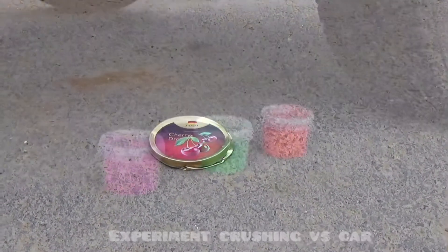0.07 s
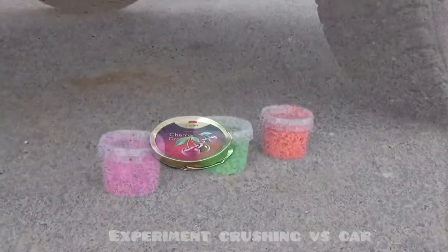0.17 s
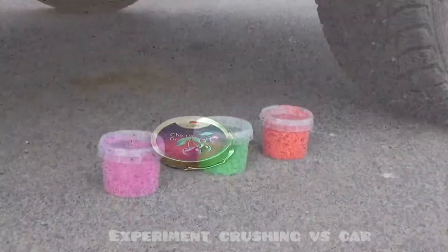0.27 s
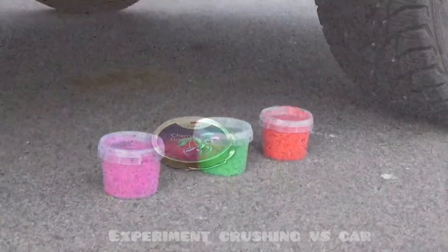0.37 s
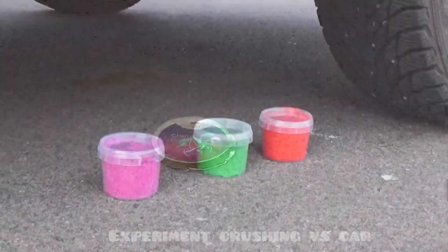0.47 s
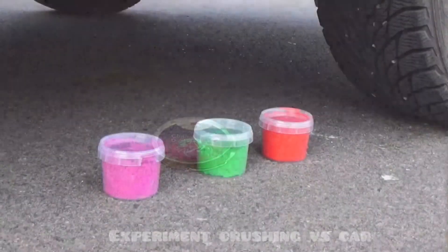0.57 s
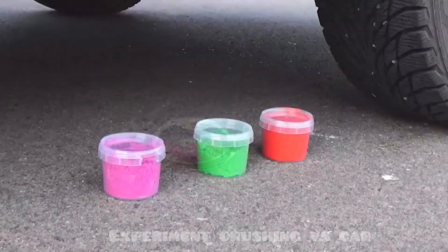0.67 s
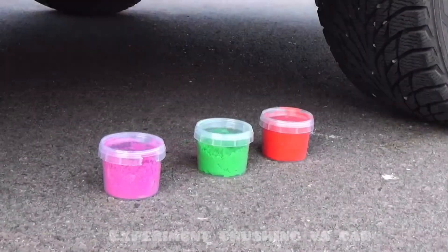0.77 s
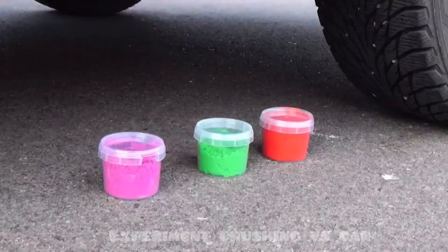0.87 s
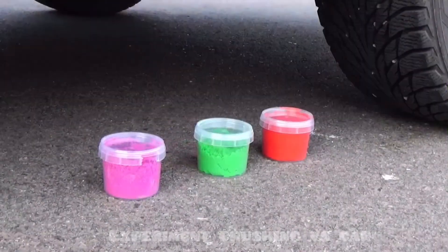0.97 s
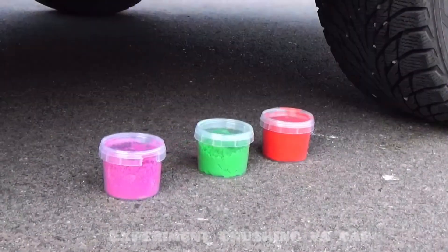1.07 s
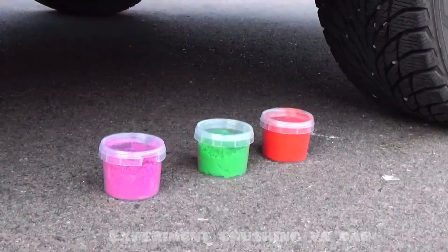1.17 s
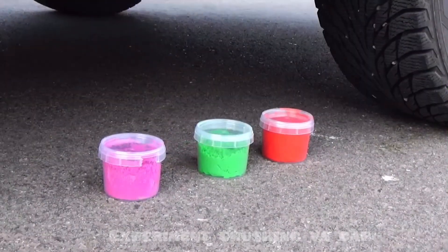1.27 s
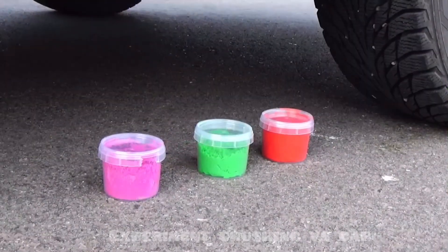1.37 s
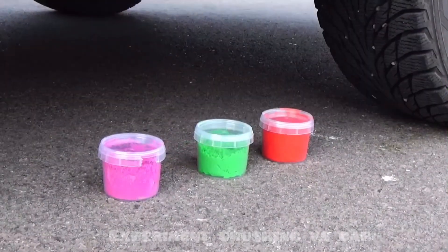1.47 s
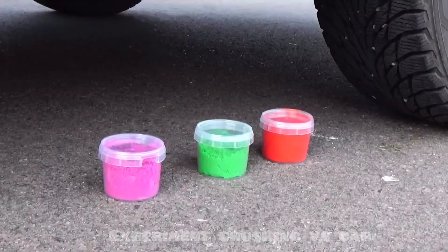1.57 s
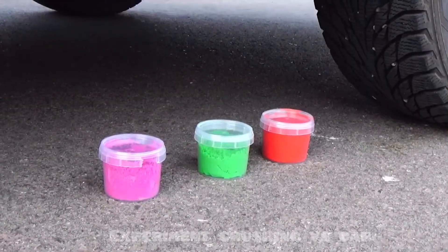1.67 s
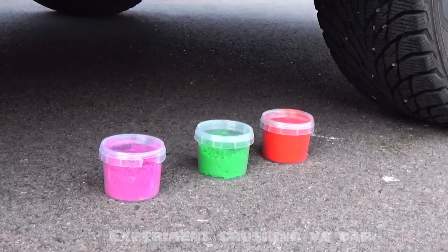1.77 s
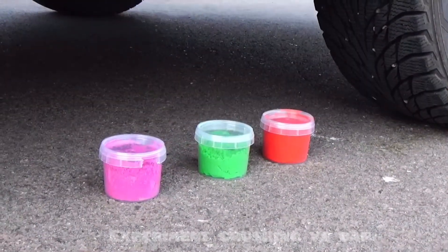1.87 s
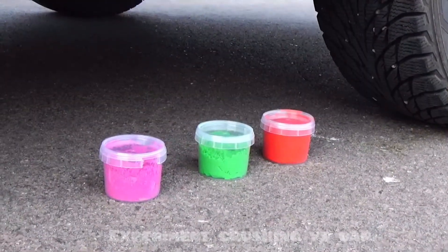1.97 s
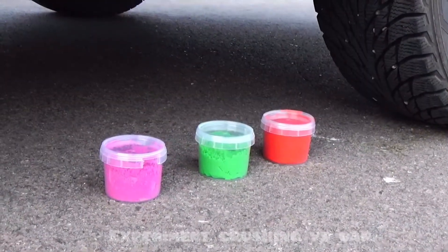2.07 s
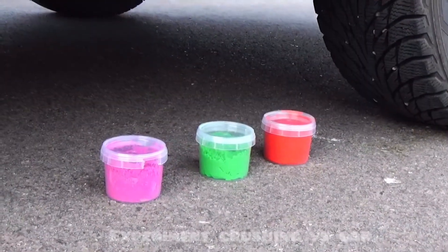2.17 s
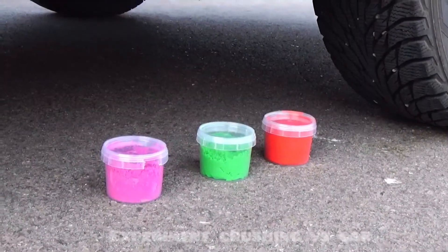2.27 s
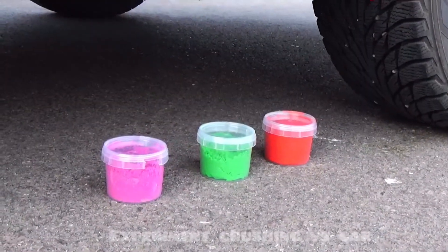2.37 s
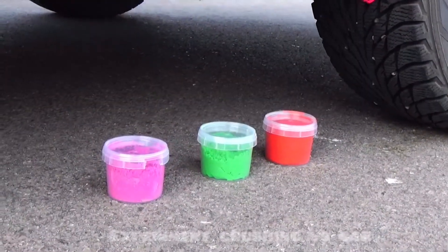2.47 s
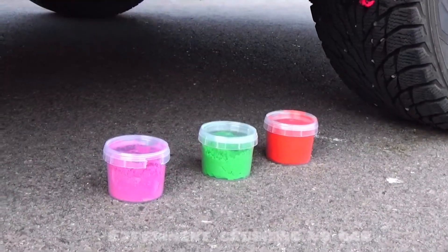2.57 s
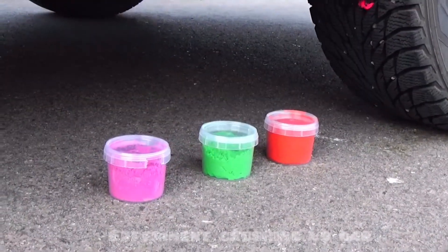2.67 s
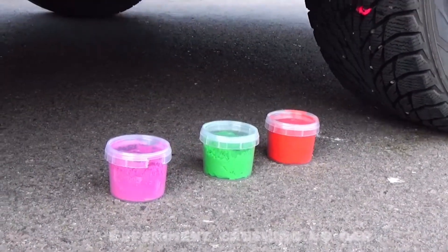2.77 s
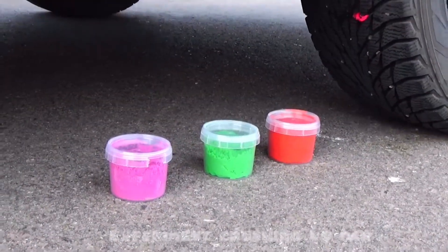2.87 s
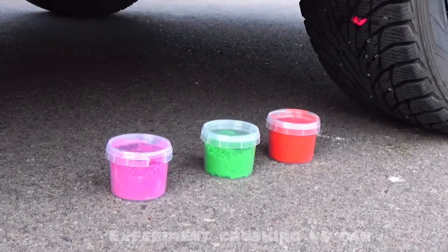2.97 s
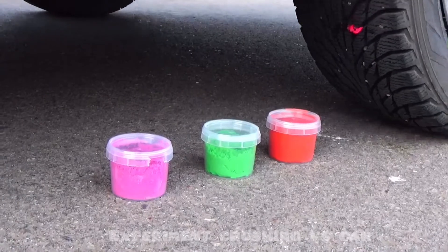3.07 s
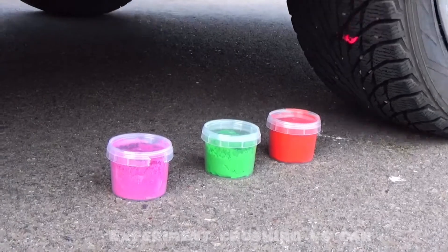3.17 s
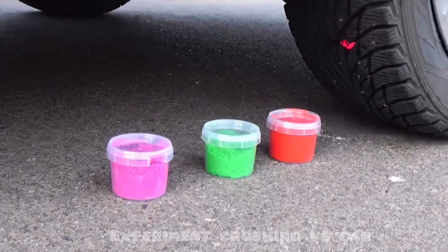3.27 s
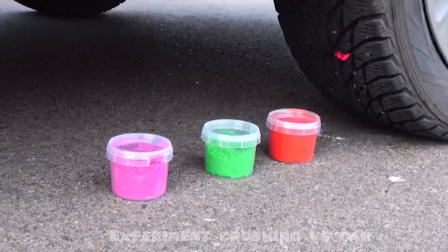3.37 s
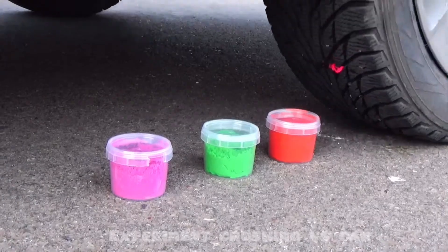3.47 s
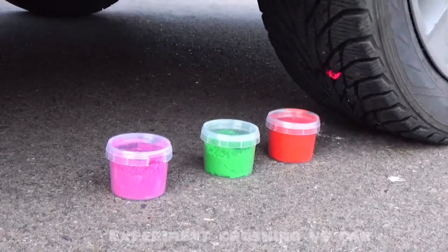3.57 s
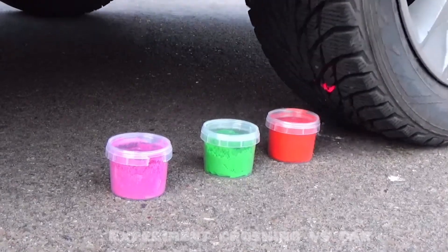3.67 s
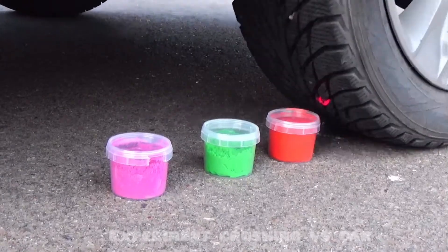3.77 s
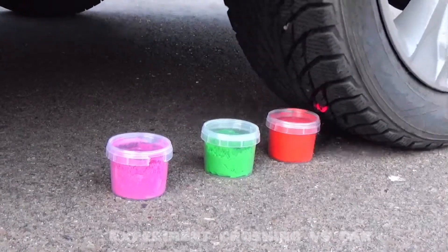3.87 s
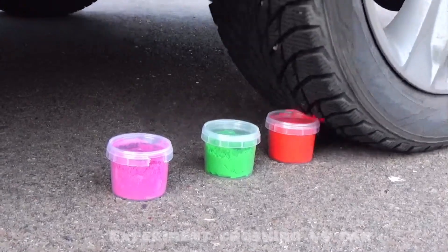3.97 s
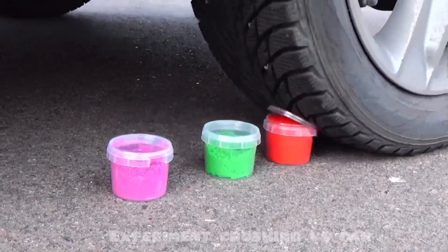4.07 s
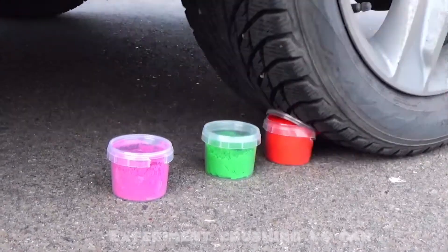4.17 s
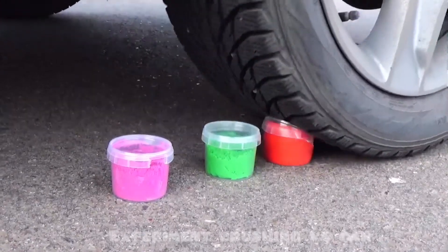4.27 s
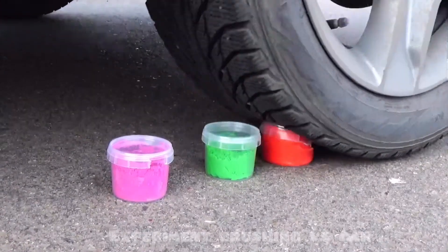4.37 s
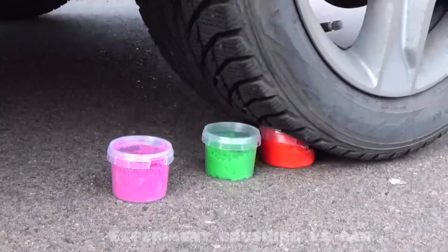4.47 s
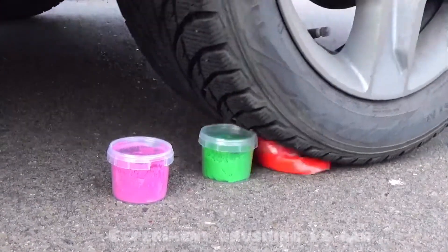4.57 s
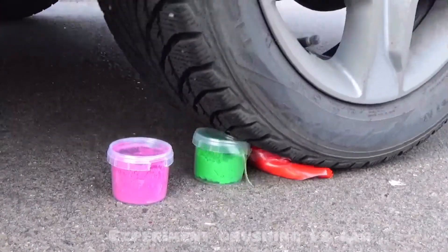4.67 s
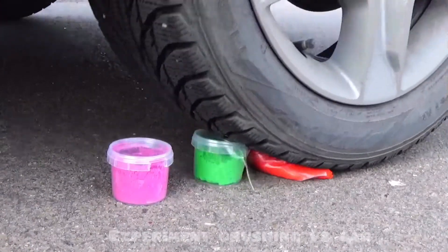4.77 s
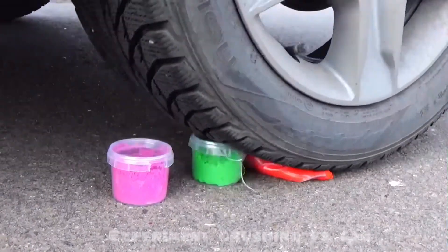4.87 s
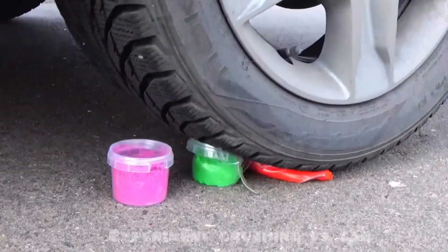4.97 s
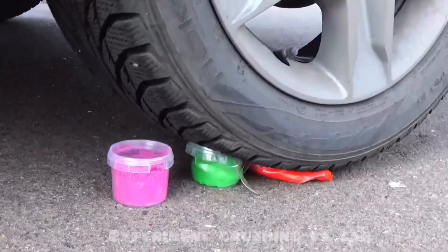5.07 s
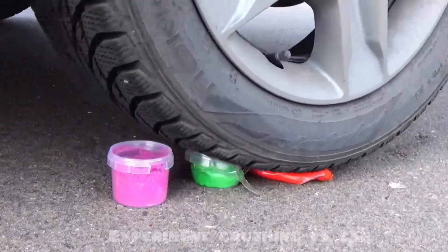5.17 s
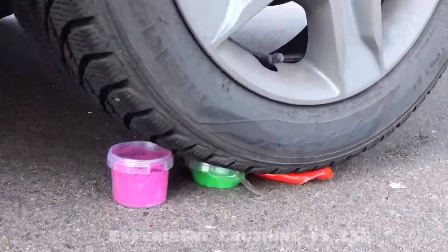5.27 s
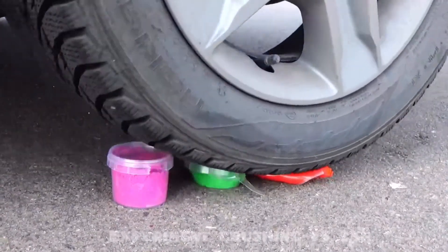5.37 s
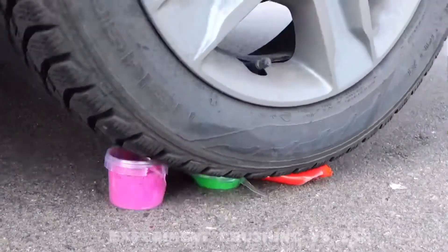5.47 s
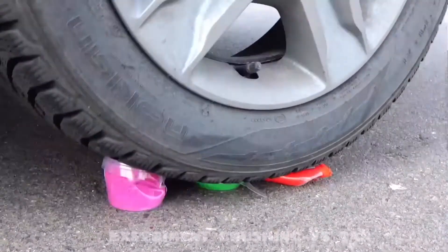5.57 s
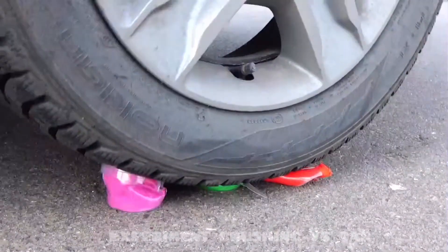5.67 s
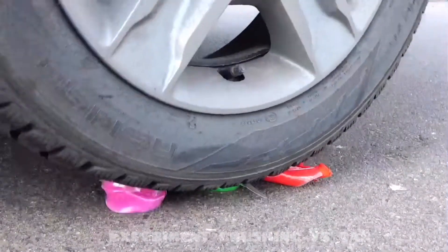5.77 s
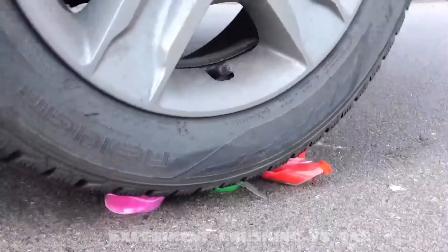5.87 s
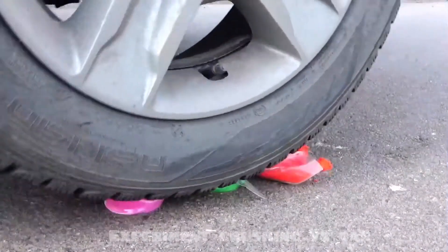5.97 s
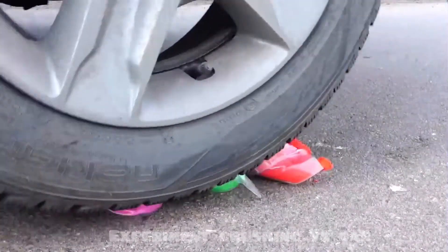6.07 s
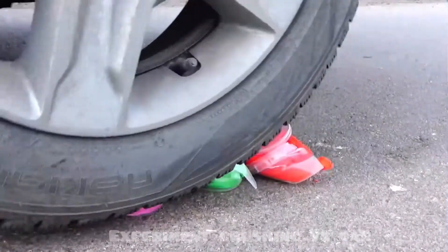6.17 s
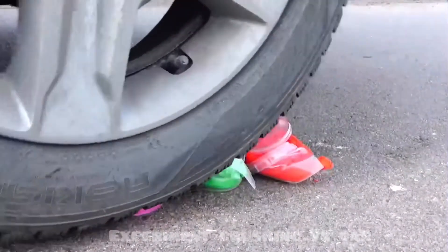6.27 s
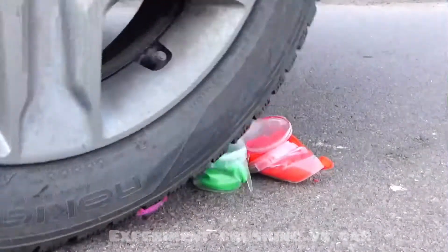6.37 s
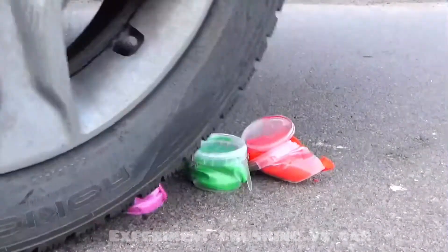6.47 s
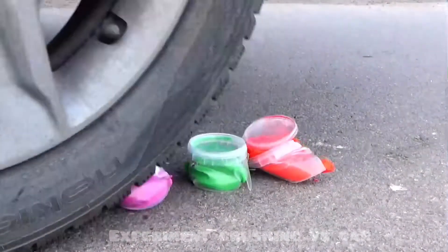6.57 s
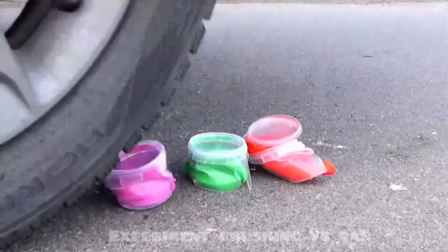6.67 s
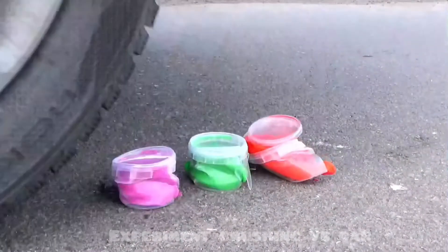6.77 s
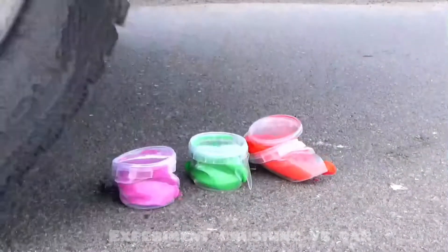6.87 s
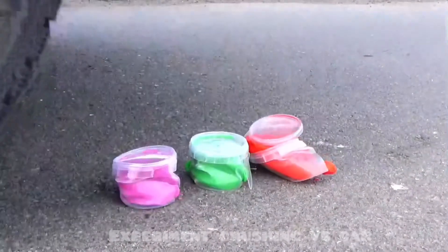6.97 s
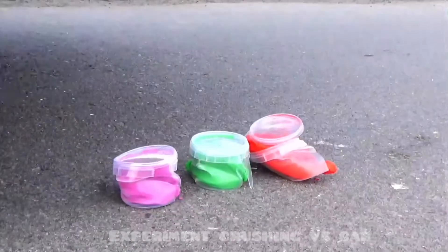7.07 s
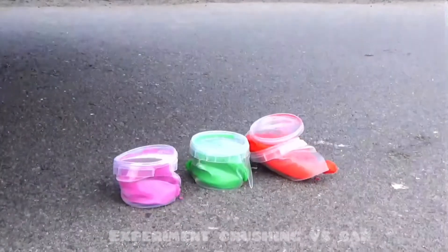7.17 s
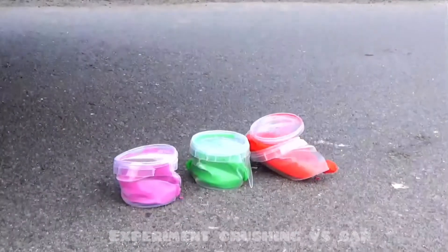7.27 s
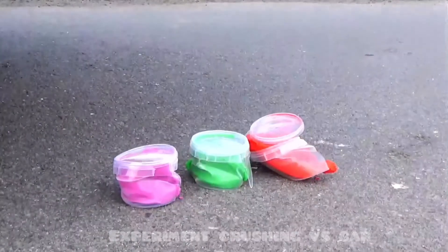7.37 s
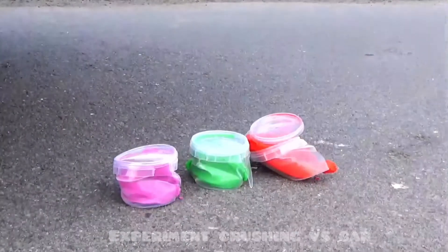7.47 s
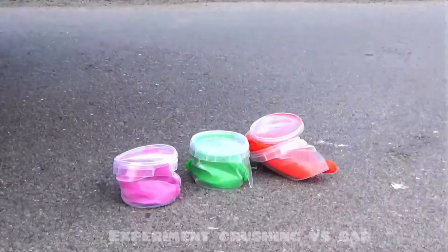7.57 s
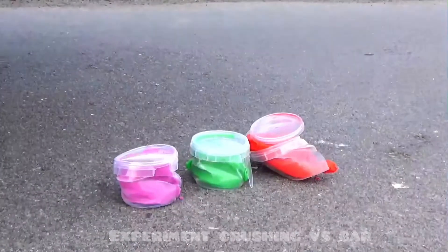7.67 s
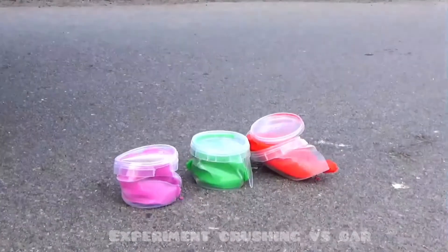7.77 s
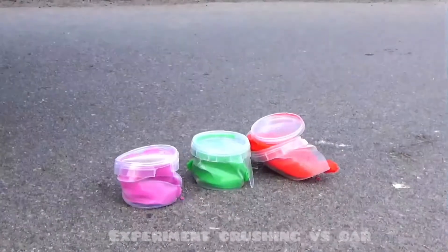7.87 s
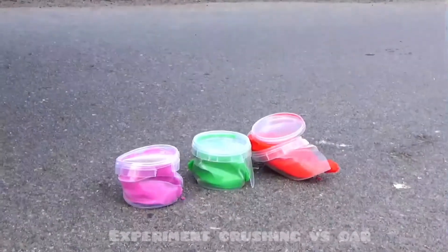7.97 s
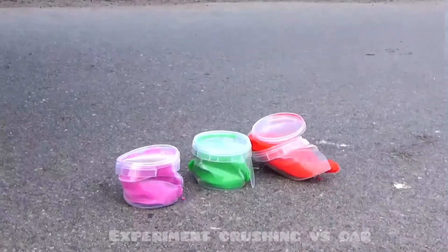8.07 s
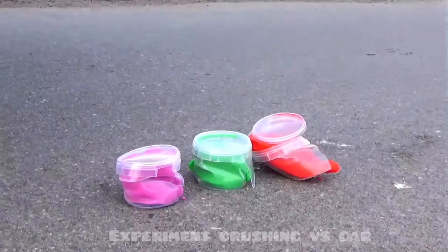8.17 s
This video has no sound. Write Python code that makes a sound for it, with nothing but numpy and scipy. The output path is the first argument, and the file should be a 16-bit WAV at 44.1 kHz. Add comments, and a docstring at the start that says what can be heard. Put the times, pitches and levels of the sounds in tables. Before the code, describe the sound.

A car engine idles low and close outdoors as a tyre slowly rolls over plastic tubs, which snap, crunch and pop, then the hum moves past.

```python
"""On asphalt, a car creeps past two close microphones, its four-cylinder engine barely above idle.
The engine sums firing orders with pulsing, filtered noise; clatter and hiss recede and the exhaust hum takes over.
The front tyre rolls over small plastic tubs: damped bursts snap, gliding tones pop and groan,
and random creases crunch, while the tyre thumps and drums. Low noise swells as air buffets the microphones."""
import sys
import numpy as np
from scipy import signal
from scipy.fft import rfft, irfft, next_fast_len
from scipy.io import wavfile
from scipy.ndimage import uniform_filter1d, minimum_filter1d

SR = 44100
rng = np.random.default_rng(int(sys.argv[2]) if len(sys.argv) > 2 else 0)


def persist_wave(psi):
    """Save psi, clipped to +-1, as 16-bit WAV."""
    counts = np.round(np.clip(psi, -1, 1) * 32767).astype(np.int16)
    wavfile.write(sys.argv[1], SR, np.atleast_2d(counts).T)


N = 362943
TIME = np.arange(N) / SR  # s

# The engine sags under load and picks up again. Each row: time in seconds, firing rate in Hz.
FIRING_RATE = [(0, 44.5), (1.65, 44.9), (1.95, 43.6), (2.5, 42.6), (6.0, 42.1), (6.54, 43.6), (6.96, 45.5),
               (7.55, 45.3), (8.23, 47.2)]
# The firing note, then its octave. Each row: level at idle in dB, growth in dB per Hz of firing rate,
# change in the wheel's shadow in dB, change as the exhaust goes by in dB, change beside the car in dB.
FIRING_NOTES = [(-29.5, 2, -4.5, 3, 0.5), (-24.5, 0.5, -11, 5, 3)]
# Weaker engine orders. Each row: multiple of the firing rate, relative level ahead of the car in dB, beside it in dB.
WEAK_ORDERS = [(.5, -33, -27), (1.5, -35.5, -31.5), (2.5, -43, -50), (3, -29.5, -41), (3.5, -35, -33.5),
               (4.5, -29.5, -31), (5, -45, -30.5), (5.5, -32.5, -37), (6, -43.5, -34.5)]
# The hum swells and sinks as the wheel rolls up. Each row: centre in seconds, half width in seconds, change in dB.
HUM_WAVERS = [(2.3, 0.29, 1.5), (2.8, .09, -9), (2.95, 0.084, 0), (3.15, 0.1, -3.5), (3.73, 0.12, -6),
              (5.72, 0.3, -3)]
# The engine bay moves away. Each row: time in seconds, relative clatter level in dB, belt and fan hiss level in dB.
BAY_LEVELS = [(1.0, -27.5, -31), (3.9, -28.5, -33.5), (5.0, -31, -35.5), (7.3, -32, -40.5),
              (8.23, -31.5, -43)]
# Spectrum of the clatter. Each row: frequency in Hz, relative level in dB.
CLATTER_SPECTRUM = [(30, -4), (110, 3), (200, -3), (290, -2.5), (420, -9), (540, -8), (700, -5), (850, -11),
                    (1250, -13), (1450, -14), (2150, -17), (2450, -18.5), (3300, -27.5), (5000, -41)]
# How the body panels colour the clatter from beside the car. Each row: frequency in Hz, gain in dB.
PANEL_GAIN = [(100, 7), (170, -1.5), (260, -3.5), (380, 2), (700, 0), (1400, 1), (2100, -1), (3000, -5)]
# Spectrum of the belt and fan hiss. Each row: frequency in Hz, relative level in dB.
HISS_SPECTRUM = [(1000, -20), (2900, -6), (3400, -1.5), (3700, 2), (3980, 3), (4300, -1), (4800, -7),
                 (5700, -6), (6500, -4), (7500, -5), (8500, -34)]
# Ringing parts of the engine. Each row: frequency in Hz, width in Hz, level ahead of the car in dB against the hiss.
RINGING_PARTS = [(349, 11, -5.5), (453, 11, -7), (1220, 50, -13), (1772, 45, -14), (2135, 75, -9),
                 (3420, 130, -15), (3946, 90, -10), (6369, 18, -20)]
# The strongest buffets of air. Each row: centre in seconds, half length in seconds, relative level in dB,
# frequency of the spectral peak in Hz.
GUSTS = [(.035, .13, -12, 137), (0.338, .05, -14.5, 142), (0.897, .07, -17, 99),
         (1.499, 0.061, -20.5, 99.3), (2.571, 0.091, -22.5, 90), (3.021, .055, -14.5, 110),
         (3.103, .065, -14, 110), (3.443, .14, -19, 114.4), (3.577, .075, -13, 96), (3.998, .04, -17, 101),
         (4.503, 0.12, -18.5, 99), (4.74, 0.074, -23, 99), (7.52, .07, -25, 131)]
# Spectrum of turbulent air, peaking at 100 Hz. Each row: frequency in Hz, relative level in dB.
AIR_SPECTRUM = [(25, -19), (60, -2), (100, 0), (160, -5), (230, -20), (600, -36.5), (2000, -72)]
# A faint squeak in two quick pulses. Each row: start in seconds, length in seconds, level in dB.
SQUEAK_PULSES = [(0.346, 0.015, -18), (0.358, 0.023, -24)]
# Partials of the squeak. Each row: frequency in Hz, relative level in dB.
SQUEAK_TONES = [(1800, -1.5), (2520, -11)]
# Snaps of a tub wall, some in quick pairs or during a crunch. Each row: start in seconds, relative level in dB,
# ring in Hz, low body in dB against the crack.
WALL_SNAPS = [(3.836, -10.5, 5350, -13), (3.9487, -16, 5030, -18), (3.96, -7.5, 2780, -3),
              (3.965, -10, 6400, -2), (4.077, -3.5, 4010, -7.5), (4.084, -10.5, 6300, -14),
              (4.141, -7.5, 4820, -4.5), (4.266, -11, 4360, -7), (4.412, -14, 4150, -7),
              (4.434, -13, 4100, 0), (4.4555, -13, 5530, 1), (4.4696, -5.5, 3850, -5),
              (4.5624, 3, 6600, -18), (4.5838, -9, 4380, -7), (4.5975, -16, 4130, -6),
              (4.6522, 0.5, 5870, -8), (4.657, -2.5, 5370, -15), (4.7934, -21, 2700, -2),
              (4.8159, 2.5, 6420, -11), (4.903, -10, 6600, -22), (4.942, -5, 4930, -7),
              (4.983, -18.5, 5270, -20), (5.0276, -9, 5500, -11), (5.48, -6.5, 4450, -24),
              (5.517, -14, 6300, -10), (5.519, -12, 5400, -1), (5.591, -11, 6050, -21),
              (5.838, -10.5, 5300, -4), (5.9576, -17.5, 4700, 10), (6.3414, -14, 2620, -18),
              (6.415, -6.5, 2200, -15), (6.4222, -13.5, 5550, -16), (6.432, -16, 6550, -5),
              (6.644, -21, 6600, -16)]
# Spectrum of a cracking tub wall. Each row: frequency in Hz, relative level in dB.
WALL_SPECTRUM = [(600, -12), (1500, -14), (2800, -10), (4000, -4), (5000, 0.5), (6500, 1), (7500, 1),
                 (8500, -14)]
# The tyre thumps down as a tub collapses. Each row: start in seconds, length in seconds, peak in dB,
# first frequency in Hz, last frequency in Hz.
TYRE_THUMPS = [(3.935, 0.044, -8.5, 97, 72.3), (4.602, .042, -8, 88.6, 118.7),
               (5.32, 0.039, -10.5, 130.4, 108), (6.407, 0.023, -10.5, 196, 151)]
# The tyre drums as it drops off a tub. Each row: start in seconds, level in dB before rise and fade.
TYRE_DRUMS = [(4.46, -16.5), (4.66, -17), (5.348, -13.5), (6.429, -20.5)]
# The tub body groans as it is squashed. Each row: start in seconds, length in seconds, level in dB,
# first frequency in Hz, last frequency in Hz.
TUB_GROANS = [(3.956, 0.11, -31, 700, 397), (4.438, 0.071, -23.5, 660, 353), (4.563, 0.095, -31, 590, 238),
              (5.217, 0.03, -26, 382, 255), (5.276, 0.084, -18.5, 600, 247)]
# Hollow pops of lids and trapped air. Each row: start in seconds, level in dB, first frequency in Hz,
# last frequency in Hz, time to fall 60 dB in seconds, lid ring in dB against the air.
LID_POPS = [(3.9658, -6.5, 910, 504, 0.019, -11), (4.7950, -7.5, 1235, 330, 0.021, -24),
            (5.2747, 0, 1010, 500, 0.0076, -8), (5.2805, -3, 460, 410, 0.019, -25),
            (5.4565, -5, 340, 262, 0.014, -36), (5.689, -12, 900, 780, 0.0086, -11),
            (6.1175, -0.5, 470, 408, 0.016, -4), (6.174, -10.5, 1020, 840, 0.011, -27),
            (6.411, -5, 520, 380, 0.012, -6), (6.623, -15, 700, 540, 0.028, -10)]
# A tub cracks, gives way and crumples. Each row: start in seconds, relative crack level in dB, rise in seconds,
# fall in seconds, crumple level in dB, cavity frequency in Hz, relative cavity level in dB,
# cavity glide in octaves per second, slit frequency in Hz, relative slit level in dB.
TUB_CRUNCHES = [(3.9716, -2.5, 0.02, 0.029, -16, 1750, -1.5, 4, 3550, -3),
                (4.0316, -3.5, .004, 0.044, -24, 1900, -11, -5, 4100, 4),
                (4.3322, -9, 0.12, 0.067, -26, 1870, -3.5, 7, 4030, -10),
                (4.4464, -6.5, 0.02, 0.023, -15.5, 2210, -4.5, -1, 4000, -8),
                (4.5606, 0, 0.021, 0.04, -11, 1500, -7, -8, 4200, -2.5),
                (5.19, -2, 0.026, 0.036, -16, 1920, 6, 4, 3900, 2.5),
                (5.2802, -4.5, 0.029, 0.028, -17, 1700, -7, -10, 4200, 3.5),
                (5.4873, -3.5, .0052, 0.03, -29, 1500, -23, -1, 3940, 9),
                (5.8329, -3, 0.0098, 0.003, -17, 1400, -20, -7, 5400, -12),
                (5.8586, -4, 0.0044, 0.026, -31, 1300, -16, -3, 4140, 6),
                (6.4081, -10, 0.0058, 0.011, -16.5, 2200, -3, -3, 3880, -16),
                (6.622, -15, 0.0013, 0.0031, -15, 2500, -0.5, 2, 3850, 11)]
# Spectrum of the creases before tilting. Each row: frequency in Hz, relative level in dB.
CREASE_SPECTRUM = [(100, 15.5), (350, 6.5), (700, 0.5), (1300, 1), (2200, -18), (2900, -16), (4000, 1),
                   (5000, -6.5), (6400, 0), (7500, -10.5)]
# Nominal left-right correlation of noise. Each row: frequency in Hz, correlation from 0 to 1.
CHANNEL_LIKENESS = [(50, .9), (125, .88), (300, .87), (700, .9), (1400, .93), (2500, .97), (4000, .98),
                    (7000, .96)]
# Stereo balance of sounds from ahead. Each row: frequency in Hz, left minus right in dB.
LEAN_AHEAD = [(50, 1), (90, -1), (150, .5), (270, 4), (460, 7.2), (800, 6), (1400, 3.8), (2500, 1.8),
              (4000, 1.6), (6000, .3)]
# Stereo balance of the engine from beside. Each row: frequency in Hz, left minus right in dB.
LEAN_BESIDE = [(50, 2), (150, 4), (270, 4.5), (460, 7.2), (800, 5.5), (1400, 5), (2500, 3.5), (4000, 1.7),
               (6000, 0)]
# Stereo balance of the tubs. Each row: frequency in Hz, left minus right in dB.
LEAN_TUBS = [(150, .5), (450, 4.3), (800, 4), (1400, 2), (2500, 1.2), (6000, .6)]

# moments of the pass: (centre s, half width s)
WHEEL_NEAREST, EXHAUST_NEAREST, TURNS_SIDE_ON = (5.48, 0.22), (6.69, 0.28), (5.5, 0.65)
IDLE_HZ = 42.2  # firing rate to which the idle levels refer
PIPE_HZ, PIPE_WIDTH_HZ, PIPE_DB = 87.9, 0.81, 2  # exhaust pipe resonance, swept by the octave
AIR_CENTRE_HZ, GUST_TRIM_DB = 100, -8.0
# weaker air around the rolling wheel: (centre s, half width s), level, unrest, rate of unrest
EDDIES_AT, EDDIES_DB, EDDIES_SWAY_DB, EDDIES_HZ = (3.9, 0.8), -32, 7, 4.9
SNAP_RISE_S, SNAP_T60_S = 0.0012, 0.0067
DRUM_HZ, DRUM_RISE_S, DRUM_FADE_DB_PER_S = 148.5, 0.017, 68.5
POP_SAG_S, LID_HZ = 0.0015, 1780  # time scale of a pop's pitch drop, ring of the lid
CRACK_HZ, CRACK_BODY_DB = 3810, -9.5  # the crack that opens a crunch
CRUMPLE_ONSET_S = 0.0049
FLAT_TILT = 0.048  # a flatter tub is brighter: dB per octave for each dB of cavity lost
FADE_IN_S, FADE_IN_DB = 0.93, -10.5
EDGE_HZ, TOP_HZ = 7400, 13000  # low-pass edges before and after the limiter


def amp(db):
    """Logarithmic level: decibels become an amplitude ratio."""
    return 10 ** (np.asarray(db) / 20)


def unit(x):
    """Power normalization: scales x to rms 1."""
    return x / np.sqrt(np.mean(x ** 2) + 1e-20)


def curves(rows):
    """Linear interpolation: the columns of a table become curves over time."""
    s, *columns = np.transpose(rows)
    return [np.interp(TIME, s, column) for column in columns]


def read(points, hz):
    """Logarithmic pitch axis: joins a table's points over log frequency."""
    f, value = np.transpose(points)
    return np.interp(np.log(hz + 1), np.log(f + 1), value)


def colour(x, gain):
    """Linear filtering: multiplies the spectrum of x by a gain that is a function of frequency."""
    size = next_fast_len(x.shape[-1] + 512)
    spectrum = rfft(x, size) * gain(np.fft.rfftfreq(size, 1 / SR))
    return irfft(spectrum, size)[..., :x.shape[-1]]


def shaped(x, points):
    """Spectral shaping: filters x by a table of levels and scales it to rms 1."""
    return unit(colour(x, lambda hz: amp(read(points, hz))))


def resonate(x, hz, width):
    """Damped resonance: a one-pole filter in a rotating frame, fixed or gliding, at rms 1."""
    turn = np.exp(2j * np.pi * np.cumsum(hz * np.ones(len(x))) / SR)
    pole = np.exp(-np.pi * width / SR)
    return unit((turn * signal.lfilter([1], [1, -pole], x / turn)).real)


def drift(rate):
    """Random modulation: low-passed noise of rms 1, slower for a lower rate in Hz."""
    return unit(colour(rng.standard_normal(N), lambda hz: np.exp(-(hz / rate) ** 2)))


def bell(centre, half_width):
    """Gaussian envelope: rises to 1 and falls again around a centre in seconds."""
    return np.exp(-((TIME - centre) / half_width) ** 2 / 2)


def add(mix, s, sound):
    """Superposition: adds a sound to the mix from time s."""
    start = round(s * SR)
    sound = sound[max(-start, 0):]
    part = mix[max(start, 0):][:len(sound)]
    part += sound[:len(part)]


def noise_pair():
    """Partial coherence: shared and opposed white noise at two close microphones."""
    mid, side = rng.standard_normal((2, N))
    side = colour(side, lambda hz: np.sqrt((1 - np.clip(read(CHANNEL_LIKENESS, hz), 0, 1)) / 2))
    return np.array([mid + side, mid - side])


def lean(x, points):
    """Interaural level difference: tips each band to the left or right."""
    return colour(x, lambda hz: amp(np.outer([.5, -.5], read(points, hz))))


def exhaust(speed, turns, passed, waver=0.44, wobble=0.38, orders_db=-1.5):
    """Harmonic synthesis: firing note and octave grow with speed; uneven cylinders add weaker, wavering orders."""
    note_db, octave_db = [
        idle_db + db_per_hz * (speed - IDLE_HZ) + shadow_db * bell(*WHEEL_NEAREST)
        + swell_db * bell(*EXHAUST_NEAREST) + side_db * passed
        for idle_db, db_per_hz, shadow_db, swell_db, side_db in FIRING_NOTES]
    octave_db = octave_db + PIPE_DB * np.exp(-((2 * speed - PIPE_HZ) / PIPE_WIDTH_HZ) ** 2 / 2)
    # below -19 dB the firing note draws the weaker orders down with it
    orders_level = amp(orders_db + np.minimum(note_db + 19.0, 0) * 0.81)
    unrest = 1 - .7 * passed  # steadier beside the car
    note_sway_db, octave_sway_db = unrest * drift(7), unrest * drift(7)
    hum = amp(note_db + note_sway_db) * np.cos(2 * np.pi * turns)
    hum += amp(octave_db + octave_sway_db) * np.cos(4 * np.pi * turns)
    for order, ahead_db, beside_db in WEAK_ORDERS:
        cycles = round(2 * order) / 2 * turns + rng.random()
        angle = 2 * np.pi * cycles + wobble * unrest * drift(3.8)
        level = orders_level * amp(ahead_db + passed * (beside_db - ahead_db))
        hum += level * (1 + waver * unrest * drift(8.3)) * np.cos(angle)
    waver_db = sum(db * bell(s, half_width) for s, half_width, db in HUM_WAVERS)
    return np.sqrt(2) * hum * amp(waver_db)


def engine_bay(turns, passed, flutter=0.047, clatter_db=3, shade_db=-5):
    """Amplitude modulation: firings pulse the clatter and excite metal resonances; belt hiss only flickers."""
    clatter_level, hiss_level = curves(BAY_LEVELS)
    throb = .18 * np.cos(2 * np.pi * turns) * (1 + .5 * drift(25))
    beat = unit(1 + throb + flutter * drift(23))
    ahead = shaped(noise_pair() * beat, CLATTER_SPECTRUM)
    beside = colour(ahead, lambda hz: amp(read(PANEL_GAIN, hz)))
    clatter = (ahead + passed * (beside - ahead)) * amp(clatter_level + clatter_db)
    hiss = shaped(noise_pair() * (1 + 0.11 * drift(65)), HISS_SPECTRUM)
    rings = sum(amp(db + shade_db * passed) * resonate(rng.standard_normal(N) * beat, hz, width)
                for hz, width, db in RINGING_PARTS)
    return clatter + (hiss + rings) * amp(hiss_level)


def bonnet(x, echo_db=-13, t60=0.071, above_hz=900):
    """Enclosure reverberation: dense treble echoes inside the engine bay ripple its spectrum finely."""
    t = np.arange(4096) / SR
    echoes = rng.standard_normal(len(t)) * amp(-60 * t / t60) * (t > .001)
    echoes = colour(echoes / np.linalg.norm(echoes), lambda hz: hz ** 2 / (hz ** 2 + above_hz ** 2))
    return x + amp(echo_db) * signal.fftconvolve(x, echoes[None], axes=1)[:, :N]


def engine():
    """Source directivity: crossfades the engine's stereo balance from ahead to the side."""
    speed, = curves(FIRING_RATE)
    turns = np.cumsum(speed) / SR  # firing cycles
    side_on_s, turning_s = TURNS_SIDE_ON
    passed = (1 + np.tanh((TIME - side_on_s) / turning_s)) / 2  # 0 ahead, 1 beside
    hum, bay = exhaust(speed, turns, passed), engine_bay(turns, passed)
    ahead, beside = lean(hum + bonnet(bay), LEAN_AHEAD), lean(hum + bonnet(bay), LEAN_BESIDE)
    return (1 - passed) * ahead + passed * beside


def buffets(apart=0.091):
    """Turbulent pressure: short swells of low noise, a little different at each microphone."""
    out = np.zeros((2, N))
    for s, length, db, centre_hz in GUSTS:
        size = round(2 * length * SR)
        spectrum = [(hz * centre_hz / AIR_CENTRE_HZ, level) for hz, level in AIR_SPECTRUM]
        shared, *own = shaped(rng.standard_normal((3, size)), spectrum) * signal.windows.hann(size) ** 2
        for channel, air in zip(out, own):
            add(channel, s - length, amp(db + GUST_TRIM_DB) * (unit(shared) + apart * unit(air)))
    return out


def squeak():
    """Additive synthesis: two soft pulses of high sine partials."""
    out = np.zeros(N)
    for s, length, db in SQUEAK_PULSES:
        t = np.arange(0, length, 1 / SR)
        tones = sum(amp(db + tone_db) * np.sin(2 * np.pi * hz * t) for hz, tone_db in SQUEAK_TONES)
        add(out, s, np.sin(np.pi * t / length) * tones)
    return out


def eddies(apart=0.55):
    """Partly coherent turbulence: weak, lumpy low noise while the wheel rolls up."""
    shared, *own = shaped(rng.standard_normal((3, N)), AIR_SPECTRUM)
    level = amp(EDDIES_DB + EDDIES_SWAY_DB * drift(EDDIES_HZ))
    return (shared + apart * np.array(own)) * bell(*EDDIES_AT) * level


def snap(db, hz, low_db, ring_db=-4, body_hz=1250, level_db=-19):
    """Buckling: a wall gives a sharp crack, a brief high ring of the facet and a lower knock of the tub."""
    t = np.arange(2048) / SR
    fade = amp(-60 * t / SNAP_T60_S) * (1 - np.exp(-t / SNAP_RISE_S))
    burst = rng.standard_normal((2, len(t))) * fade
    ring = unit(np.sin(2 * np.pi * hz * t) * fade ** 2)
    crack = unit(shaped(burst[0], WALL_SPECTRUM) + amp(ring_db) * ring)
    body = amp(low_db) * resonate(burst[1], body_hz, 1100)
    return amp(db + level_db) * (crack + body)


def snaps():
    """Impulsive release: places the buckling snaps of the tub walls."""
    out = np.zeros(N)
    for s, db, hz, low_db in WALL_SNAPS:
        add(out, s, snap(db, hz, low_db))
    return out


def tyre():
    """Impact and cavity resonance: the dropping tyre gives a gliding thump, and the air inside it hums on."""
    out, t = np.zeros(N), np.arange(SR) / SR
    for s, length, db, first_hz, last_hz in TYRE_THUMPS:
        hz = np.geomspace(first_hz, last_hz, round(length * SR))
        add(out, s, amp(db) * np.sin(2 * np.pi * np.cumsum(hz) / SR) * signal.windows.hann(len(hz)))
    for s, db in TYRE_DRUMS:
        level = amp(db - DRUM_FADE_DB_PER_S * t) * np.minimum(t / DRUM_RISE_S, 1)
        add(out, s, level * np.sin(2 * np.pi * DRUM_HZ * t))
    return out


def groans(width_hz=420):
    """Gliding resonance: twice-filtered noise slides down as the wheel presses a hollow tub flat."""
    out = np.zeros(N)
    for s, length, db, first_hz, last_hz in TUB_GROANS:
        hz = np.geomspace(first_hz, last_hz, round(length * SR))
        body = resonate(rng.standard_normal(len(hz)), hz, width_hz)
        body = resonate(body, hz, width_hz)
        add(out, s, amp(db) * body * signal.windows.hann(len(hz)))
    return out


def pops(slap=.2, attack_s=0.00012, lid_t60=0.0045):
    """Pressure release: escaping air gives damped cycles of falling pitch, a dull slap and a brief lid ring."""
    out, t = np.zeros(N), np.arange(4096) / SR
    for s, db, first_hz, last_hz, t60, lid_db in LID_POPS:
        hz = last_hz + (first_hz - last_hz) * np.exp(-(t / POP_SAG_S) ** 2)
        puff = resonate(rng.standard_normal(len(t)), last_hz, 2 * first_hz)
        air = (slap * puff - np.sin(2 * np.pi * np.cumsum(hz) / SR)) * amp(-60 * t / t60)
        lid = np.sin(2 * np.pi * LID_HZ * t) * amp(lid_db - 60 * t / lid_t60)
        add(out, s, amp(db) * (1 - np.exp(-t / attack_s)) * (air + lid))
    return out


def crunches(grains_per_s=7000, spread_db=0.7, squareness=3, cavity_width_hz=800, slit_width_hz=950,
             sputter_db=1.5, cavity_lag_s=0.0025, slit_linger=1.07):
    """Crackling noise: after a crack, random creases excite a gliding cavity and a lingering slit at the lid."""
    out = np.zeros(N)
    for (s, crack_db, rise, fall, db, cavity_hz, cavity_db, glide,
         slit_hz, slit_db) in TUB_CRUNCHES:
        t = np.arange(-rise, 4 * fall, 1 / SR)  # 0 at the height of the swell
        swell, late, lingering = [np.exp(-np.where(u < 0, -u / rise, u / fall) ** squareness / 2)
                                  for u in (t, t - cavity_lag_s, t / slit_linger)]
        chance, size, sign, surge = rng.random((len(t), 4)).T
        size_gain = amp(spread_db * np.minimum(-np.log(size), 3))
        grains = (chance < grains_per_s / SR) * size_gain * np.sign(sign - .5)
        grains *= amp(sputter_db * unit(uniform_filter1d(surge - .5, size=200)))
        tilted = [(hz, level - FLAT_TILT * cavity_db * np.log2(hz)) for hz, level in CREASE_SPECTRUM]
        broad = shaped(grains, tilted)
        # fresh random signs make each resonance independent of the broad creases
        cavity_drive = grains * rng.choice([-1, 1], len(t))
        cavity = amp(cavity_db) * resonate(cavity_drive, cavity_hz * 2 ** (glide * t), cavity_width_hz)
        slit_drive = grains * rng.choice([-1, 1], len(t))
        slit = amp(slit_db) * resonate(slit_drive, slit_hz, slit_width_hz)
        crumple = broad * swell + cavity * late ** 2 + slit * lingering
        crumple /= np.std(broad + cavity + slit)
        add(out, s, snap(crack_db, CRACK_HZ, CRACK_BODY_DB))
        add(out, s, amp(db) * crumple * np.minimum((t + rise) / CRUMPLE_ONSET_S, 1))
    return out


def underbody(x, t60=0.073, wet_db=-13):
    """Diffuse reflection: short scatter between the asphalt and the floor of the car."""
    t = np.arange(SR // 4) / SR
    spectrum = [(150, -1.0), (400, 4.0), (1400, 5.5), (2800, 4.5), (4000, -4.5), (5000, 4), (7500, -4.0)]  # Hz, dB
    tail = shaped(rng.standard_normal((2, len(t))), spectrum) * amp(-60 * t / t60) * (t > .002)
    return amp(wet_db) * signal.fftconvolve(x[None], tail / np.linalg.norm(tail[0]), axes=1)[:, :N]


def scene():
    """Superposition of sources: engine, air and the tubs under the tyre, fading in."""
    tubs = snaps() + pops() + crunches() + groans() + squeak()
    fade_in = amp(FADE_IN_DB * np.maximum(1 - TIME / FADE_IN_S, 0) ** 1.82)
    air_and_tyre = lean(buffets() + eddies() + tyre(), LEAN_AHEAD)
    return fade_in * (engine() + air_and_tyre + lean(tubs + underbody(tubs), LEAN_TUBS))


def duck_bass(x, threshold_db=-25, share=0.5, recovery_db_per_s=90, split_hz=230, treble_hz=400):
    """Sidechain compression: loud treble turns the bass down, which then recovers at a steady rate."""
    bass = colour(x, lambda hz: 1 / (1 + (hz / split_hz) ** 4))
    treble = colour(x.mean(0), lambda hz: 1 - 1 / (1 + (hz / treble_hz) ** 4))
    treble_db = 10 * np.log10(abs(uniform_filter1d(treble ** 2, size=441)) + 1e-12)
    over_db = share * np.maximum(treble_db - threshold_db, 0)
    fall = TIME * recovery_db_per_s
    duck_db = fall - np.maximum.accumulate(over_db + fall)
    return x - bass + bass * amp(uniform_filter1d(duck_db, size=220))


def band_limit(x, hz):
    """Low-pass filtering: a long windowed impulse response cuts steeply above hz."""
    response = signal.firwin(1601, hz, window=("kaiser", 7), fs=SR)
    return signal.oaconvolve(x, response[None], "same")


def record(dry, recovery_db_per_s=150):
    """Peak limiting of a narrow band: fast gain changes spread the hardest snaps a little above the band."""
    heard = band_limit(duck_bass(dry), EDGE_HZ)
    over_db = 20 * np.log10(np.maximum(abs(heard).max(0) / .93, 1))
    fall = TIME * recovery_db_per_s
    duck_db = minimum_filter1d(fall - np.maximum.accumulate(over_db + fall), size=12)
    return band_limit(heard * amp(uniform_filter1d(duck_db, size=12)), TOP_HZ)


dry = scene()
out = record(dry)
persist_wave(out)
```